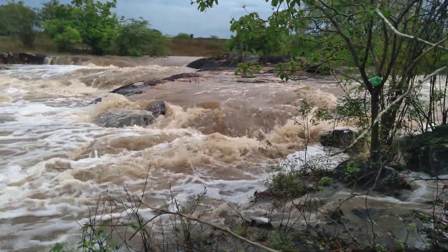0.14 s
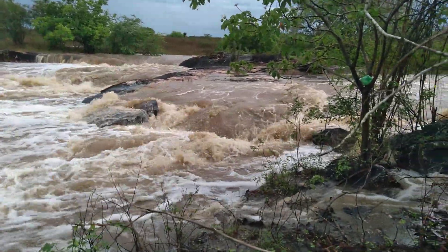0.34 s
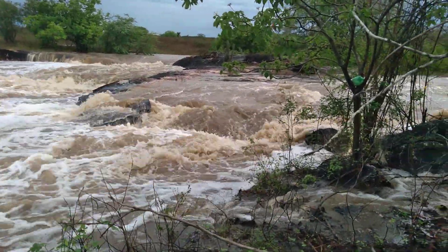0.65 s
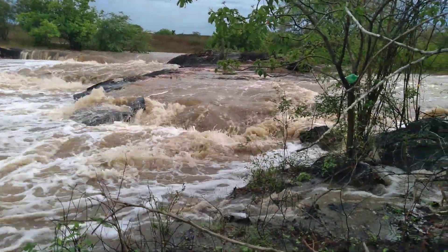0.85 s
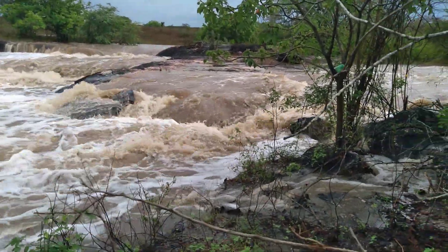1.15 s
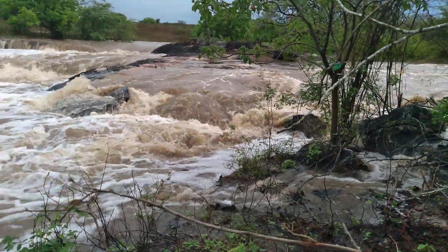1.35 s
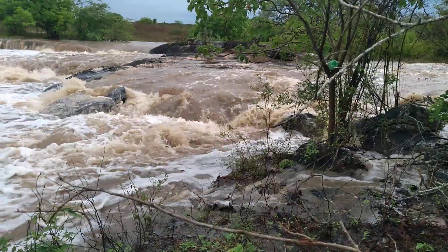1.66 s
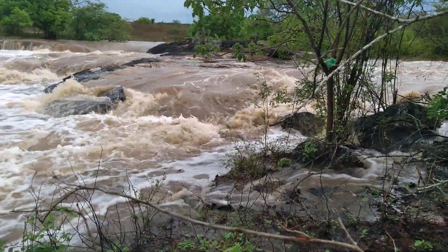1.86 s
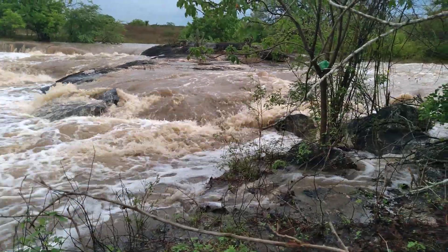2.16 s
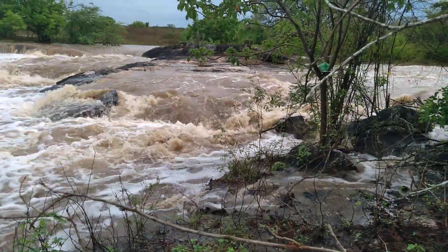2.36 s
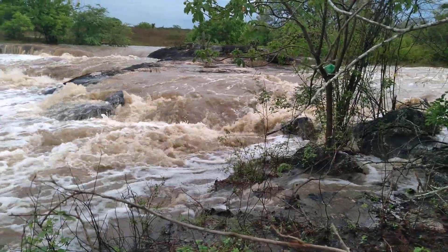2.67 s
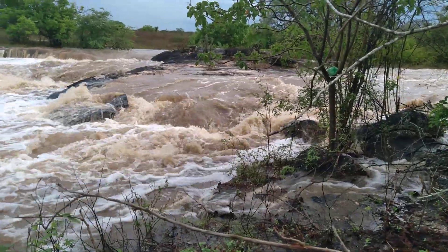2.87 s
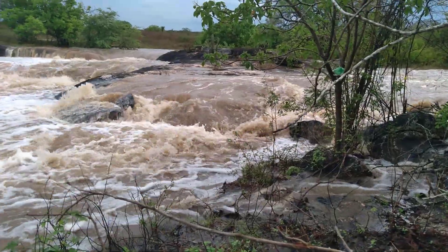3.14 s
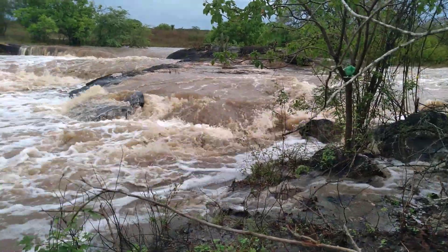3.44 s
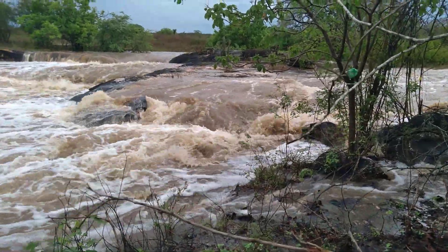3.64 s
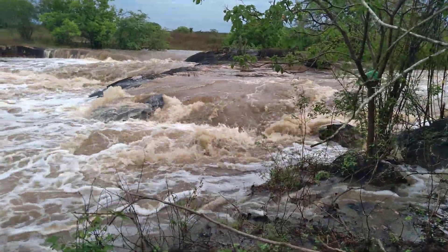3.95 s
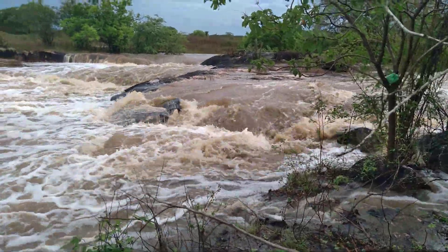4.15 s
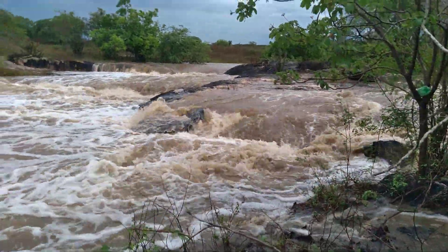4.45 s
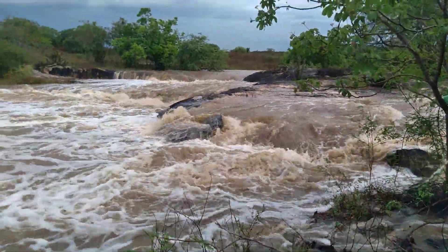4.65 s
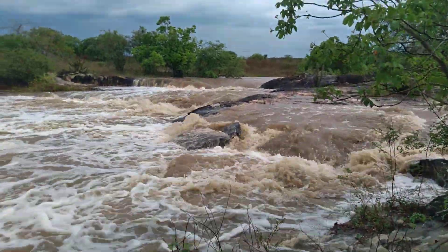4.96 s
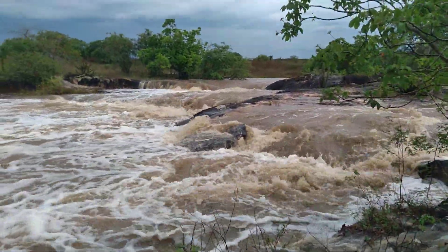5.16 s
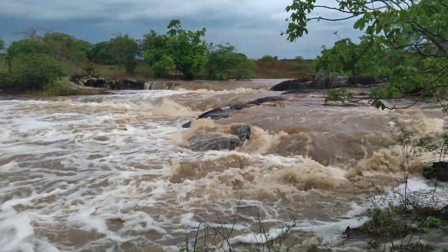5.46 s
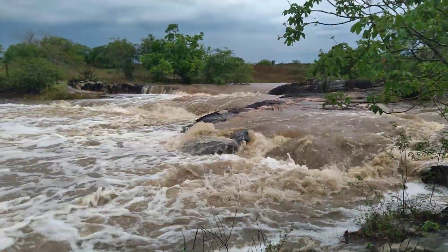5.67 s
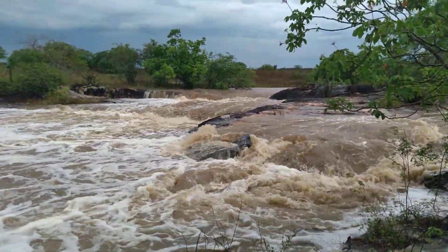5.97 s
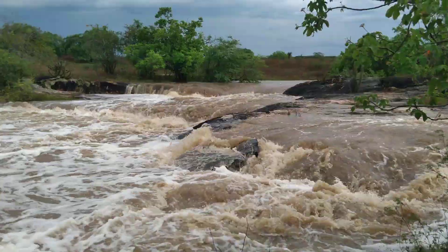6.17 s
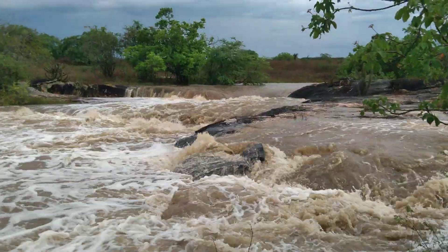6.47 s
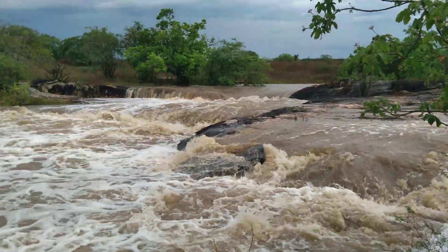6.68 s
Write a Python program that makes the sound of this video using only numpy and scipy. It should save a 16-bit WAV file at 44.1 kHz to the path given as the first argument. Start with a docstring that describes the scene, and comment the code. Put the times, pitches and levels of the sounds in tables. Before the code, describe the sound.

Continuous white water outdoors, heard from the bank: dense foamy hiss, rushing roar and fine bubbling splashes at a nearly constant level. Short, quiet gurgles come and go in the rapids, and the texture wavers with slight swishes. A few toppling crests splash briefly, one midway and two late. The low end is weak, with only occasional faint thumps. The sound is mono, gradually losing some splash brightness toward the end.

```python
"""A creek bank in flood, above rock ledges: a standing wave gurgles in surges (ringing bubbles plus wash).
Rapids roar and splash (banded noise plus bubbles); foam hisses with spray (high noise plus short rings).
Moving bell filters make the rush waver and swish; three brief noise splashes mark toppling crests.
Below lie a faint rumble of low noise and soft low thumps. Both channels carry one microphone's signal."""
import sys
import numpy as np
from scipy import signal
from scipy.fft import rfft, irfft, next_fast_len
from scipy.io import wavfile
from scipy.ndimage import uniform_filter1d

SR = 44100
rng = np.random.default_rng(int(sys.argv[2]) if len(sys.argv) > 2 else 0)


def dump(signal):
    """Clip the signal to [-1, 1] and save it as 16-bit WAV at the path in sys.argv[1]."""
    limited = np.clip(np.atleast_2d(signal).T, -1, 1)
    pcm = np.round(limited * 32767).astype(np.int16)
    wavfile.write(sys.argv[1], SR, pcm)


N = 300321
TIME = np.arange(N) / SR


def undb(db):
    """Decibels to gain."""
    return 10 ** (np.asarray(db) / 20)


def unit(x):
    """Scale to an rms of one."""
    return x / np.sqrt(np.mean(x ** 2) + 1e-18)


def curves(table):
    """Interpolate the columns of a time table, sample by sample."""
    s, *columns = np.transpose(table)
    return [np.interp(TIME, s, column) for column in columns]


def envelope(start_s, length_s, attack_s, release_s):
    """Rise before the start, hold at one for the length, then fall."""
    end_s = start_s + length_s
    return np.interp(TIME, [start_s - attack_s, start_s, end_s, end_s + release_s], [0, 1, 1, 0])


def walk(rate_hz):
    """Smoothed random curve: rate_hz random knots a second, rms one."""
    knots = rng.standard_normal(2048)
    path = np.interp(TIME * rate_hz, np.arange(len(knots)), knots)
    return unit(uniform_filter1d(path, 256))


def colour(x, spectrum):
    """Filter x by gain points, linear in dB over log frequency; rms one."""
    size = next_fast_len(N)
    hz, db = np.transpose(spectrum)
    bins_hz = np.maximum(np.fft.rfftfreq(size, 1 / SR), 1)
    gain = undb(np.interp(np.log(bins_hz), np.log(hz), db, left=-120, right=-120))
    return unit(irfft(rfft(x, size) * gain, size)[:N])


def bells(x, bumps):
    """Raise or lower bell-shaped bands (Hz, half width Hz, dB); centre and dB may move with time."""
    hz, s, frames = signal.stft(x, SR, nperseg=1024)
    for centre_hz, half_width_hz, db in bumps:
        distance = (hz[:, None] - np.interp(s, TIME, centre_hz)) / half_width_hz
        frames = frames * undb(np.interp(s, TIME, db) * np.exp(-distance ** 2))
    return signal.istft(frames, SR)[1][:N]


def add(out, s, sound):
    """Mix a sound into out from time s."""
    i = int(np.clip(s * SR, 0, N - 1))
    out[i:i + len(sound)] += sound[:N - i]


def churn(lo_hz, hi_hz, flicker_db, rate_hz, count):
    """Turbulent noise in neighbouring bands, each swelling and fading on its own."""
    edges_hz = np.geomspace(lo_hz, min(hi_hz, .45 * SR), count + 1)
    out = 0
    for band_hz in zip(edges_hz, edges_hz[1:]):
        bandpass = signal.butter(2, band_hz, "bandpass", fs=SR, output="sos")
        noise = signal.sosfilt(bandpass, rng.standard_normal(N))
        out = out + noise * undb(flicker_db * walk(rate_hz))
    return unit(out)


def bubbles(lo_hz, hi_hz, cycles, spread_db, glide, count):
    """Single bubbles ring for some cycles, rising in pitch as they near the surface; a few are much louder."""
    when, pitch, loud, sign = rng.random((count, 4)).T[:, :, None]
    hz = lo_hz + (hi_hz - lo_hz) * pitch
    loudness = undb(-spread_db * np.log(1 - .99 * loud))
    size = loudness * np.sign(sign - .5) * np.sqrt(hz)
    n = np.arange(int(cycles * SR / lo_hz) + 2)
    age = n * hz / SR / cycles  # 1 = faded by 60 dB
    decay = np.exp(-np.log(1000) * age)
    phase = 2 * np.pi * cycles * age * (1 + glide * np.minimum(age, 1) / 2)
    ring = size * decay * np.sin(phase)
    place = (when * N).astype(int) + n
    return unit(np.bincount(place.ravel(), ring.ravel(), N)[:N])


# Standing-wave surges: start t/s, length/s, level before SURGE_GAIN_DB/dB, air-pocket note f/Hz
WAVE_SURGES = [(0.079, 0.081, -36, 686), (0.207, 0.078, -39, 735), (0.356, 0.048, -37, 720),
               (0.44, 0.068, -35, 676), (0.594, 0.31, -36, 740), (0.974, 0.24, -35, 625),
               (1.29, 0.091, -36.5, 666), (1.45, 0.166, -38, 704), (1.654, 0.086, -36, 605),
               (1.769, 0.038, -41, 700), (1.833, 0.32, -35, 683), (2.24, 0.076, -37, 620),
               (2.32, 0.06, -41.5, 600), (2.48, 0.048, -41, 696), (2.58, 0.047, -36.5, 577),
               (2.652, 0.25, -34.5, 580), (2.995, 0.093, -31.5, 600), (3.276, 0.47, -33.5, 627),
               (3.77, 0.062, -39, 630), (3.858, 0.044, -33, 610), (3.964, 0.076, -36, 609),
               (4.057, 0.154, -38, 630), (4.221, 0.036, -43, 630), (4.317, 0.088, -37.5, 630),
               (4.853, 0.086, -35.5, 567), (4.99, 0.088, -36.5, 640), (5.322, 0.066, -35, 660),
               (5.38, 0.052, -37.5, 654), (5.473, 0.091, -35, 632), (5.626, 0.15, -37.5, 593),
               (5.96, 0.082, -37, 642), (6.107, 0.146, -34, 705), (6.363, 0.2, -35.5, 607),
               (6.616, 0.032, -36.5, 634), (6.743, 0.027, -39, 716)]
# Gurgle filter: f/Hz, gain/dB
GURGLE_FILTER = [(330, -48), (410, -11), (470, -7), (530, -2.5), (620, 0), (720, 0.5), (850, 3.5),
                 (1000, -58)]
SURGE_ATTACK_S, SURGE_RELEASE_S, SURGE_GAIN_DB = 0.026, 0.036, -2.5
SIMMER_DB = -48  # floor under the surges
NOTE_HALF_WIDTH_HZ, NOTE_LIFT_DB, NOTE_OFFSET_HZ = 123, 11, -30


def standing_wave():
    """The folding wave traps large air pockets, which gurgle in surges around a gliding note."""
    power = undb(SIMMER_DB) ** 2
    notes = []
    for s, length_s, db, hz in WAVE_SURGES:
        surge = undb(db + SURGE_GAIN_DB) * envelope(s, length_s, SURGE_ATTACK_S, SURGE_RELEASE_S)
        power = power + surge ** 2
        notes.append((s + length_s / 2, hz))
    note_hz, = curves(notes)
    pockets = bubbles(443.4, 875.0, cycles=65, spread_db=3.5, glide=0.18, count=1500)
    wash = churn(333, 1030, flicker_db=1.5, rate_hz=14, count=6)
    gurgle = colour(pockets + undb(-3) * wash, GURGLE_FILTER)
    lift_db = NOTE_LIFT_DB + 0.51 * walk(17)
    gurgle = bells(gurgle, [(note_hz + NOTE_OFFSET_HZ, NOTE_HALF_WIDTH_HZ, lift_db)])
    return unit(gurgle) * np.sqrt(power)


# Rapids filters, roar and splash: f/Hz, gain/dB
ROAR_FILTER = [(620, -31), (760, -9.5), (870, -5.5), (1000, -0.2), (1300, 0), (1800, 1), (2150, -1),
               (2500, -2), (3000, -32)]
SPLASH_FILTER = [(1900, -15.5), (2350, 10.5), (2650, 2.5), (2950, 3), (3500, -0.5), (4100, -6), (4700, -28)]


def rapids(roar_db, splash_db):
    """Air beaten into the water roars; smaller bubbles splash more patchily above it."""
    roar = churn(595, 3224, flicker_db=.5, rate_hz=26, count=8)
    roar = roar + undb(-5) * bubbles(781, 2410, cycles=17, spread_db=2.5, glide=0.18, count=9000)
    splash = churn(1797, 5150, flicker_db=2.0, rate_hz=28, count=8)
    splash = splash + undb(-7.0) * bubbles(2380, 3900, cycles=12, spread_db=2.0, glide=0.11, count=6000)
    roar = colour(roar, ROAR_FILTER) * undb(roar_db)
    return roar + colour(splash, SPLASH_FILTER) * undb(splash_db + 0.76 * walk(7.8))


# Spray bursts: start t/s, length/s, lift of the hiss level/dB
SPRAY_BURSTS = [(0.37, .05, 0.8), (0.548, 0.065, 1.2), (3.262, 0.038, 1), (3.616, 0.063, 0.6),
                (5.87, 0.13, 1)]
# Spray filter: f/Hz, gain/dB
SPRAY_FILTER = [(3400, -16), (4200, -7), (5100, -4.5), (6200, -3.5), (7540, 0), (9400, -2), (11000, -5.5),
                (13300, -7.5), (16000, -5.5)]
BURST_ATTACK_S, BURST_RELEASE_S = 0.025, 0.053


def spray(level_db):
    """Foam bursts in a fine hiss, and flung droplets tick back onto the water."""
    lift_db = sum(db * envelope(s, length_s, BURST_ATTACK_S, BURST_RELEASE_S)
                  for s, length_s, db in SPRAY_BURSTS)
    foam = churn(3110, 18840, flicker_db=0.68, rate_hz=26, count=9)
    droplets = bubbles(6300, 11800, cycles=9.6, spread_db=2.0, glide=.1, count=11000)
    hiss = colour(foam + undb(-8.0) * droplets, SPRAY_FILTER)
    return hiss * undb(level_db + lift_db + 0.21 * walk(36))


# Narrow hollows in the rush: mean f/Hz, half width/Hz, depth before waver/dB,
# added depth at full turn before waver/dB, waver of depth (rms of its natural log)
RUSH_HOLLOWS = [(864, 75, 0, -8, 0.69), (2398, 154, -27, -8, 0.22), (3314, 92, -3, -8, 0.62),
                (3720, 103, -13, -6.5, 0.77), (3980, 60, -27, -9, 0.65), (4124, 114, -13, -18, 0.26),
                (4510, 120, -7.5, 2, 0.53)]
# Dips of the broad band: start t/s, length/s, level change/dB
BAND_DIPS = [(0.88, 0.088, -8), (3.13, .08, -7), (3.48, 0.17, -7), (4.88, 0.048, -8)]
BAND_HZ, BAND_HALF_WIDTH_HZ, BAND_DB, BAND_WAVER_DB = 4090, 650, 0.5, 1.5
DIP_FADE_S = 0.087
HOLLOW_WANDER = 0.018  # rms, share of each hollow's mean pitch


def swish(rush, turn):
    """Wavering hollows swish through the rush; most deepen as the microphone turns; a broad band dips."""
    dips_db = sum(db * envelope(s, length_s, DIP_FADE_S, DIP_FADE_S) for s, length_s, db in BAND_DIPS)
    band_hz = BAND_HZ + 40 * walk(12)
    band_db = BAND_DB + BAND_WAVER_DB * walk(14) + dips_db
    bumps = [(band_hz, BAND_HALF_WIDTH_HZ, band_db)]
    for hz, half_width_hz, depth_db, turn_db, waver in RUSH_HOLLOWS:
        centre_hz = hz * (1 + HOLLOW_WANDER * walk(30))
        hollow_db = (depth_db + turn_db * turn) * np.exp(waver * walk(24))
        bumps.append((centre_hz, half_width_hz, hollow_db))
    return bells(rush, bumps)


# Rumble swells: start t/s, length/s, level before SWELL_GAIN_DB/dB
RUMBLE_SWELLS = [(0.035, 0.11, -50), (0.549, 0.15, -49), (1.14, 0.038, -51), (1.44, 0.064, -52),
                 (1.564, 0.172, -52), (3.301, 0.054, -49), (5.115, 0.063, -49), (6.124, 0.27, -49),
                 (6.567, 0.197, -50.5)]
# Soft low thumps: t/s, peak level/dB, f/Hz, length/s
LOW_THUMPS = [(0.03, -39, 152, 0.031), (0.104, -38, 152, 0.021), (0.548, -32, 167, 0.028),
              (0.63, -37, 198, 0.023), (0.805, -41, 169, 0.038), (1.074, -31, 197, 0.034),
              (1.138, -37, 140, 0.026), (1.491, -42, 165, 0.062), (1.556, -40, 190, 0.026),
              (1.78, -42, 173, 0.037), (2.347, -37, 259, 0.033), (4.395, -42, 179, 0.062),
              (4.44, -33, 179, 0.022), (5.204, -34, 237, 0.031), (6.19, -39, 187, 0.034),
              (6.255, -44, 119, 0.059)]
# Rumble filter: f/Hz, gain/dB
RUMBLE_FILTER = [(15, -47), (25, -24), (71, 1), (171, -5), (233, -3), (343, -12), (380, -13), (490, -27),
                 (840, -120)]
SWELL_ATTACK_S, SWELL_RELEASE_S, SWELL_GAIN_DB = 0.027, .07, -2
RUMBLE_DB, BODY_DB = -61, -55.0  # RUMBLE_DB: floor under the swells


def rumble():
    """Uneven low noise swells now and then; thumps are short sines under a smooth arch."""
    swells = sum(undb(db + SWELL_GAIN_DB) * envelope(s, length_s, SWELL_ATTACK_S, SWELL_RELEASE_S)
                 for s, length_s, db in RUMBLE_SWELLS)
    deep = colour(churn(17, 167, flicker_db=2.0, rate_hz=20, count=3), RUMBLE_FILTER)
    deep = deep * np.hypot(undb(RUMBLE_DB + 1.3 * walk(8)), swells)
    body = colour(churn(115, 503, flicker_db=2.5, rate_hz=16, count=3), RUMBLE_FILTER) * undb(BODY_DB)
    out = deep + body
    for s, db, hz, length_s in LOW_THUMPS:
        t = np.arange(int(length_s * SR)) / SR
        arch = np.sin(np.pi * t / length_s) ** 2
        add(out, s, undb(db) * arch * np.sin(2 * np.pi * (hz * t + rng.random())))
    return out


# Toppling crests: start t/s, rms level at the arch's top/dB, centre f/Hz, length/s
TOPPLING_CRESTS = [(3.296, -36, 2780, 0.075), (6.09, -35, 2960, 0.061), (6.28, -35, 2720, 0.079)]


def crests():
    """A toppling crest splashes: a brief arch of narrow-band noise."""
    out = np.zeros(N)
    for s, db, hz, length_s in TOPPLING_CRESTS:
        arch = np.hanning(int(length_s * SR))
        bandpass = signal.butter(2, [hz - 250, hz + 250], "bandpass", fs=SR, output="sos")
        noise = unit(signal.sosfilt(bandpass, rng.standard_normal(SR)))
        add(out, s, undb(db) * arch * noise[:len(arch)])
    return out


# White-water strength: t/s, level/dB
WATER_FLOW = [(0.03, -24.5), (0.44, -24), (3.47, -24), (3.73, -23.5), (4.6, -24.5), (6.04, -24.5),
              (6.73, -25), (6.75, -24.5)]
# Microphone turn from bank toward open water: t/s, share of the turn (0-1)
MIC_TURN = [(0, 0.1), (2.7, 0.0), (4.0, 0.35), (4.8, 0.42), (6.81, 1.0)]
ROAR_DB, SPLASH_DB, SPRAY_DB = -6, -6.5, -1.02  # relative to the flow
TURN_ROAR_DB, TURN_SPLASH_DB = -0.5, -4.0  # change at full turn


def scene():
    """One flow drives roar, splash and spray; all reach one microphone, so both channels are alike."""
    flow_db, = curves(WATER_FLOW)
    turn, = curves(MIC_TURN)
    roar_db = flow_db + ROAR_DB + TURN_ROAR_DB * turn
    splash_db = flow_db + SPLASH_DB + TURN_SPLASH_DB * turn
    rush = standing_wave() + rapids(roar_db, splash_db) + spray(flow_db + SPRAY_DB)
    creek = swish(rush, turn) + crests() + rumble()
    return np.array([creek, creek])


TOP_HZ = 15720


def record(dry):
    """The recorder cuts the top steeply: an elliptic low-pass."""
    lowpass = signal.ellip(12, .1, 80, TOP_HZ, fs=SR, output="sos")
    return signal.sosfilt(lowpass, dry)


dry = scene()
out = record(dry)
dump(out)
```